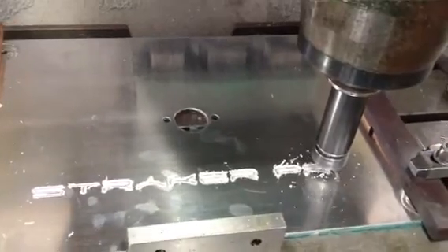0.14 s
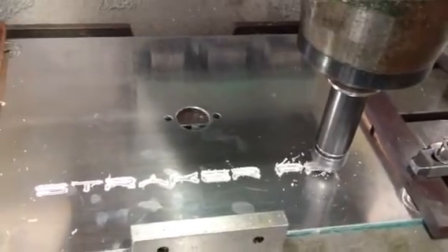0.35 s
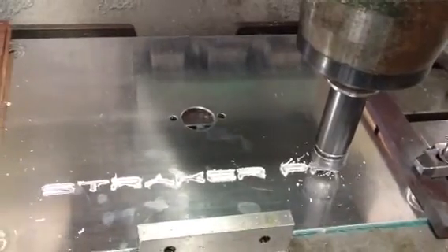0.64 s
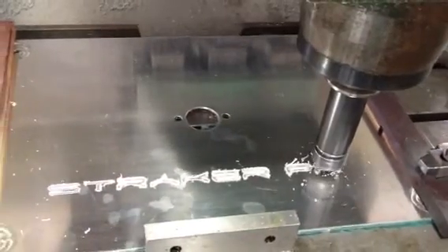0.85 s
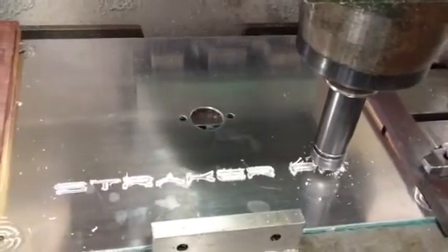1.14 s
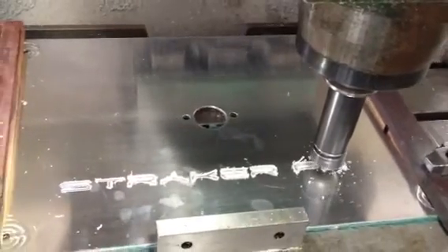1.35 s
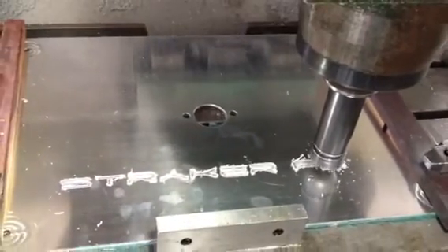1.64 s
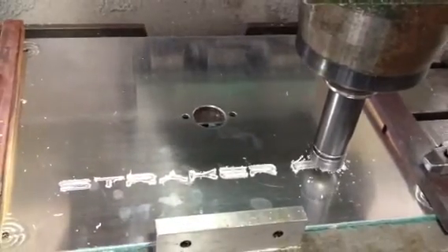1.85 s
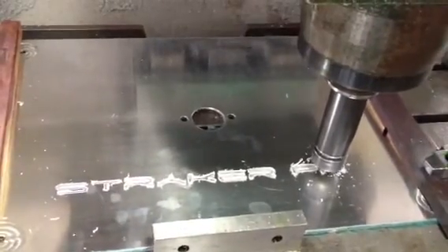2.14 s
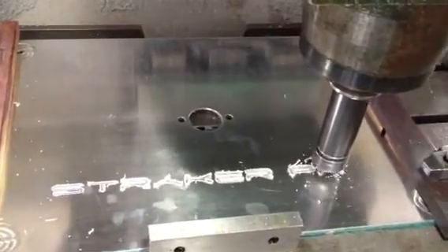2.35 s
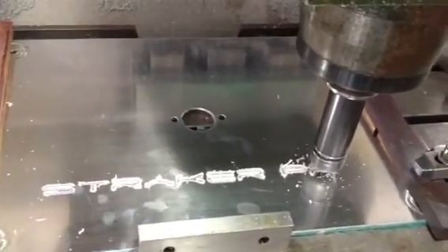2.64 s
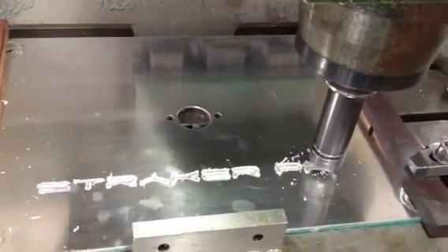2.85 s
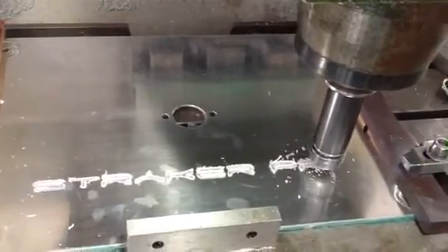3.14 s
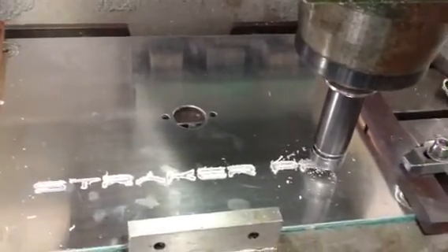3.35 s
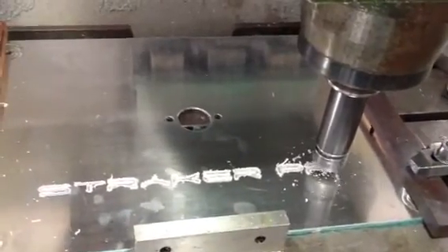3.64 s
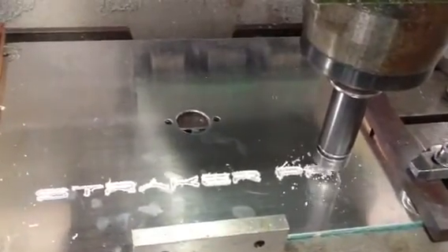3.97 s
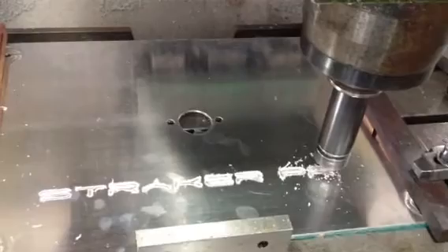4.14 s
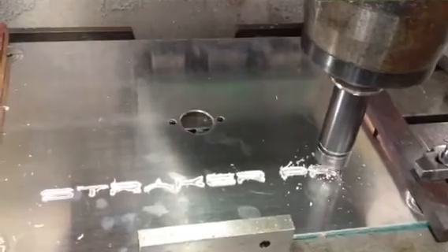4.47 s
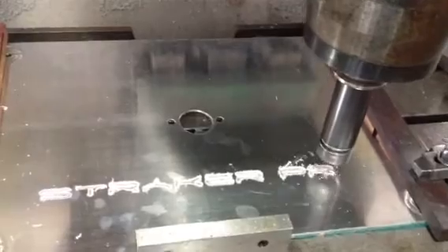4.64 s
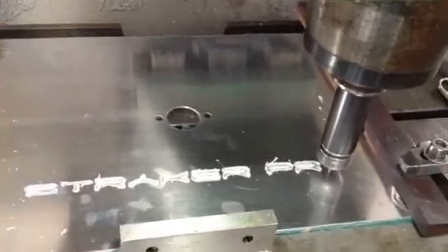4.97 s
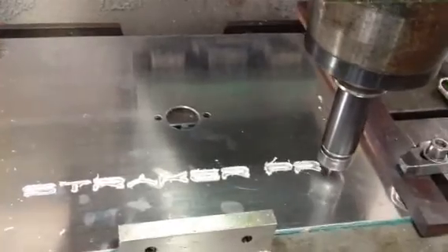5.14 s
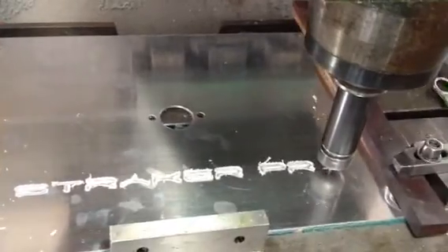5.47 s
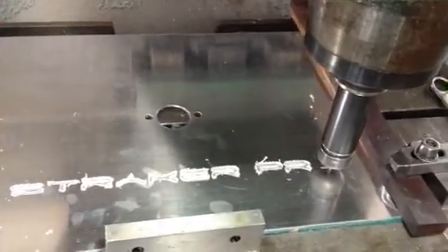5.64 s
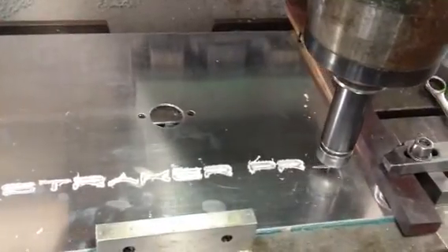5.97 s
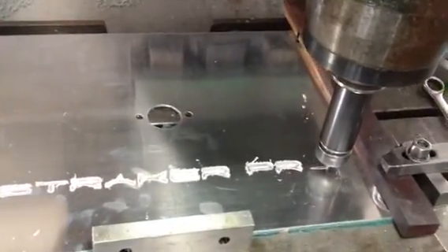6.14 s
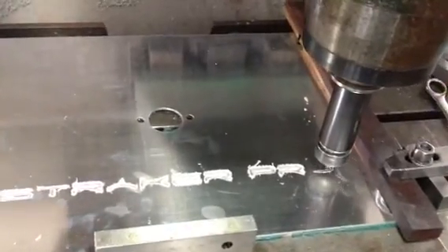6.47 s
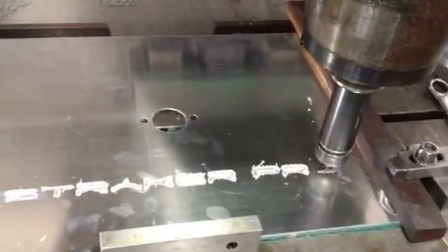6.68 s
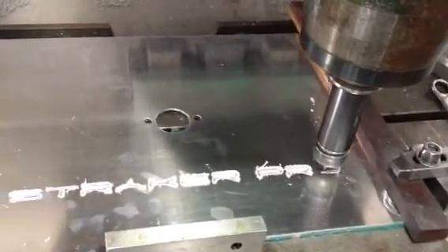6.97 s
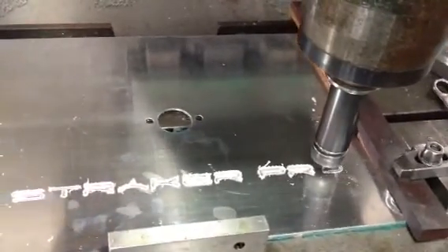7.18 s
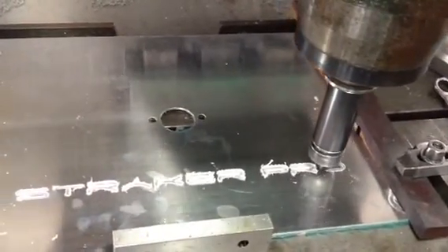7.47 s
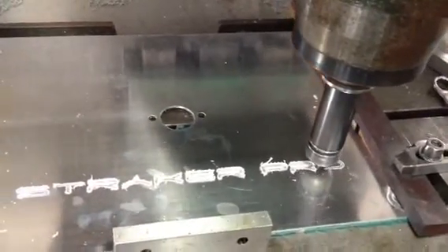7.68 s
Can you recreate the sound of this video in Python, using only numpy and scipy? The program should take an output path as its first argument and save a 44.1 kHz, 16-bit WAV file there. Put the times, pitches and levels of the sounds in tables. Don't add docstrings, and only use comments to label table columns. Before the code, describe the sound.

A milling spindle hums and clatters steadily, muffled then clear, with two faint air puffs before a loud whistling blast of compressed air rings through the workshop.

```python
import sys
import numpy as np
from scipy import signal
from scipy.fft import rfft, irfft, next_fast_len
from scipy.io import wavfile
from scipy.ndimage import uniform_filter1d, map_coordinates

SR = 44100
rng = np.random.default_rng(int(sys.argv[2]) if len(sys.argv) > 2 else 0)


def volts(x):
    e = np.asarray(x, float) / 20
    return 10 ** e


def log_audio(samples):
    frames = np.atleast_2d(samples).T
    limited = np.clip(frames, -1, 1)
    pcm = np.round(limited * 32767).astype(np.int16)
    wavfile.write(sys.argv[1], SR, pcm)


N = 344421
T = np.arange(N) / SR
FAST = next_fast_len(N)
HZ = np.fft.rfftfreq(FAST, 1 / SR)

SPINDLE_HZ = 22.318
GEAR_ORDERS = [5, 14, 15, 16, 17, 22, 26, 27, 28, 29, 31, 33, 39, 42, 48, 50, 56, 58, 60, 72, 77, 82, 107,
               126, 138, 148, 162, 163, 172]
GEAR_DB = [-56, -50, -49, -36, -45, -51, -52, -49, -44, -44, -50, -51, -52, -53, -53, -53, -50, -53, -54,
           -53, -57, -51, -58, -59, -60, -59, -60, -59, -61]
# [f/Hz, level/dB rms each]
CLATTER = [(100, -62), (300, -60), (700, -59), (1500, -63), (2500, -64), (4000, -71), (5500, -79),
           (7000, -88)]
DRIVE_HZ = [117.3, 230.5, 251.1, 345.345, 484.7, 879.3, 1947.9, 2147.7, 2210.9, 5766.2, 6749.8, 8567.0]
DRIVE_DB = [-55, -44, -50, -40, -51, -55, -51, -59, -56, -63, -75, -81]
# [f/Hz, level/dB per Hz]
RUMBLE = [(30, -38), (70, -23), (90, -13.5), (115, -10), (155, 1), (210, 1.5), (450, -2), (740, 0),
          (880, -4.5), (1400, -7), (2700, -12), (4800, -16.5), (6500, -22), (9200, -35.5)]
# [f/Hz, width/Hz, level/dB]
BEARINGS = [(493, 97, 3.5), (885, 30, 5), (1980, 250, 6), (2300, 250, -2.5), (3310, 260, 6),
            (6680, 170, 8.5), (7300, 320, 5), (14100, 2900, -16)]
# [t/s, f/Hz]
FEED_HZ = [
    (0, 234),
    (2.4, 234.1),
    (3.5, 241),
    (3.75, 236),
    (3.95, 243),
    (4.3, 235),
    (4.6, 232),
]
# [harmonic, level/dB]
FEED_TONES = [(1, -2), (2, 0.5), (3, -1.5)]
# [t/s, level/dB]
BITES = [
    (.02, -44),
    (1.4, -35.5),
    (2.0, -40),
    (3.2, -46),
    (3.95, -44),
    (4.3, -41),
]
# [t/s, peak level/dB]
KNOCKS = [(0.081, -31), (1.3, -27), (1.949, -33), (2.461, -29), (3.051, -30), (3.2, -29), (3.699, -30),
          (4.503, -23), (4.623, -23), (4.755, -24), (4.95, -24)]
# [t/s, peak level/dB, f/Hz]
NOZZLE_KNOCK = (4.50, -12.5, 286)
# [start t/s, held t/s, level/dB]
LIGHT_SQUEEZES = [
    (3.066, 0.13, -44),
    (4.255, 0.32, -42),
]
# [start t/s, held t/s, level/dB]
FULL_SQUEEZE = (4.5, .524, -17)
# [f/Hz, level/dB per Hz]
PUFF = [(1180, -26), (2000, -11), (2180, -1.5), (2560, -5.5), (3900, -1.5), (5250, -3.5), (8360, -16),
        (12500, -19), (15100, -17)]
# [f/Hz, level/dB per Hz]
BLAST = [(530, -35), (900, -17.5), (1870, -11), (2080, -11.5), (2260, -13), (2790, -6), (3620, -5.5),
         (4220, -3.5), (5350, -3.5), (6240, -2.5), (10200, -14.5), (13600, -8.5), (15100, -12)]
# [f/Hz, width/Hz, level/dB]
PLATE = [(2800, 82, -7), (4290, 130, 4), (5500, 65, -9), (6180, 110, -4), (6840, 43, -1), (7300, 43, -7),
         (7900, 44, -11), (8240, 51, 5)]
# [f/Hz, t/s]
SHOP_T60_S = [(1000, 1.0), (4000, 0.85), (12000, 0.64)]
# [f/Hz, level/dB]
MUFFLE = [(100, -7), (220, -4.5), (350, -9), (700, -13), (1400, -18), (2800, -24), (5000, -27.5),
          (7000, -22.5), (9500, -23), (13000, -17.5)]
# [t/s, share of the full cut 0-1]
RELEASE = [
    (0, 1),
    (1.9, .99),
    (2.6, 0.78),
    (2.85, 0.43),
    (3.1, 0.12),
    (3.5, 0.04),
    (7.81, 0),
]


def shape(hz, table):
    f, value = np.transpose(table)
    return np.interp(np.log(np.maximum(hz, 1)), np.log(f), value)


def colour(table):
    white = rng.standard_normal(FAST)
    return irfft(rfft(white) * volts(shape(HZ, table)), FAST)[:N]


def level(x, db):
    return x * volts(db) / np.sqrt(np.mean(x ** 2))


def walk(rate, when=T):
    steps = np.repeat(rng.standard_normal(int(N / SR * 50) + 2), 8)
    smooth = 1.295 * uniform_filter1d(uniform_filter1d(steps, size=8), size=8)
    return np.interp(when * min(rate, 50) * 8, np.arange(len(smooth)), smooth)


def flicker(x, slow_db, quick_db, rate):
    hz, s, spec = signal.stft(x, SR, nperseg=512)
    octave = np.clip(np.log2(np.maximum(hz, 1)), 6, 14)[:, None]
    db = 0
    for centre in range(6, 15):
        share = np.clip(1 - abs(octave - centre), 0, 1)
        db = db + share * (slow_db * walk(1.48, s) + quick_db * walk(rate, s))
    return signal.istft(spec * volts(db), SR)[1][:N]


def resonate(x, peaks, boost):
    lift = 1 + sum(boost * volts(db) / (1 + (2 * (HZ - f) / width) ** 2) for f, width, db in peaks)
    return irfft(rfft(x, FAST) * lift, FAST)[:N]


def spindle():
    orders = np.arange(5, 320)
    chance = rng.standard_normal((len(orders), 2))
    scatter = (chance[:, 0] + 1j * chance[:, 1]) / np.sqrt(2)
    weak, strong = np.zeros((2, 4097), complex)
    weak[orders] = volts(shape(orders * SPINDLE_HZ, CLATTER)) * scatter
    weak[GEAR_ORDERS] = 0
    order = np.array(GEAR_ORDERS)
    timing = rng.random(30)[order // 6]
    strong[GEAR_ORDERS] = volts(np.array(GEAR_DB)) * np.exp(2j * np.pi * (order ** 2 / 4 + order * timing))
    turn = irfft(weak + strong) * 4096 * np.sqrt(2)
    place = (SPINDLE_HZ * T + 0.0003 * walk(2)) % 1 * 8192
    clatter = map_coordinates(turn, [place], order=3, mode="grid-wrap")
    return flicker(clatter, 0.48, 0.6, 6)


def drive():
    out = np.zeros(N)
    for hz, db in zip(DRIVE_HZ, DRIVE_DB):
        loudness = np.sqrt(2) * volts(db + 0.5 * walk(4.97))
        out += loudness * np.sin(2 * np.pi * (hz * T + rng.random()) + 0.19 * walk(2.86))
    return out


def rumble():
    noise = resonate(colour(RUMBLE), BEARINGS, 0.37)
    return level(flicker(noise, 0.46, 0.95, 12), -34.5)


def feed():
    idle_db, fade_db_s = -46, 31
    stop_s, stop_db_s = 4.9, 119
    speed_hz = np.interp(T, *np.transpose(FEED_HZ)) * (1 + 0.0028 * walk(12))
    phase = 2 * np.pi * np.cumsum(speed_hz) / SR
    load_db = np.max([db - fade_db_s * abs(T - s) for s, db in BITES], axis=0)
    gain = volts(np.maximum(load_db, idle_db) - stop_db_s * np.maximum(T - stop_s, 0))
    return gain * sum(volts(db + 3.6 * walk(9)) * np.sin(k * phase) for k, db in FEED_TONES)


def knocks():
    table_hz, ring_cycles = 154.5, 33.5
    thud = level(colour([(60, -24), (130, -16), (320, -3), (700, -12), (1500, -52)]), -6.5)
    out = np.zeros(N)
    for s, db, hz in [(s, db, table_hz) for s, db in KNOCKS] + [NOZZLE_KNOCK]:
        t = np.maximum(T - s, 0)
        t60 = ring_cycles / hz
        fade = volts(db - 60 * t / t60) * np.minimum(t / 0.02, 1) ** 2
        out += fade * (np.sin(2 * np.pi * hz * t) + thud)
    return out


def trigger(squeezes, open_s, bend, close_db_s):
    out = np.zeros(N)
    for s, held, db in squeezes:
        opening = np.clip((T - s) / open_s, 0, 1) ** bend
        out += opening * volts(db - close_db_s * np.maximum(T - s - held, 0))
    return out


def bounce(x, echo_db, reach_s, drift_s):
    out = x
    for lag in reach_s * rng.random(6) ** 1.5:
        heard = np.clip(SR * (T - lag - drift_s * walk(5)), 0, N - 1).astype(int)
        out = out + volts(echo_db) * x[heard]
    return out


def blow_gun():
    puff = level(flicker(colour(PUFF), 0.34, 0.49, 24.4), 9.4)
    puff = puff * trigger(LIGHT_SQUEEZES, open_s=0.055, bend=1.1, close_db_s=68)
    jet = bounce(resonate(colour(BLAST), PLATE, 0.61), echo_db=-15.5, reach_s=0.008, drift_s=0.0001)
    blast = level(flicker(jet, 0.18, 0.89, 40), 0.75)
    blast = blast * trigger([FULL_SQUEEZE], open_s=0.17, bend=2.12, close_db_s=330)
    surge_s, surge_width_s, surge_db = 4.693, 0.014, 3.5
    surge = volts(surge_db * np.exp(-((T - surge_s) / surge_width_s) ** 2))
    return puff + blast * surge


def shop(x):
    hz, s, spec = signal.stft(rng.standard_normal(SR), SR, nperseg=256)
    fade_db = -60 * s / shape(hz, SHOP_T60_S)[:, None]
    tail = signal.istft(spec * volts(fade_db), SR)[1]
    tail = tail * (1 - np.exp(-np.arange(len(tail)) / SR / 0.024))
    return signal.fftconvolve(x, tail / np.sqrt(np.sum(tail ** 2)))[:N]


def scene():
    air = blow_gun()
    machine = spindle() + drive() + feed() + rumble() + knocks()
    mono = machine + air + volts(-14) * shop(air)
    return np.array([mono, mono])


def suppress(x):
    treble_lag_s, loud_lets_go_s = 0.16, 3.225
    tones_spared = 0.56
    gain_db, duck_db, duck_s, recover_s = 1.03, -1.97, 4.65, 2.4
    hz, s, spec = signal.stft(x, SR, nperseg=1024)
    bass, treble = (np.interp(s - lag, *np.transpose(RELEASE)) for lag in (0, treble_lag_s))
    treble = treble * np.clip((loud_lets_go_s - s) / 0.15 + 0.5, 0.02, 1)
    height = shape(hz, [(700, 0.069), (5000, 0.94)])[:, None]
    share = np.clip(bass + height * (treble - bass), 0, 1)
    usual_db = 20 * np.log10(np.median(abs(spec[0]), axis=1) + 1e-9)
    tones_db = np.maximum(usual_db - uniform_filter1d(usual_db, size=9), 0) * (hz > 1200)
    cut_db = (shape(hz, MUFFLE) + tones_spared * tones_db)[:, None] * share
    volume_db = gain_db + duck_db * (s > duck_s) * np.exp(-np.maximum(s - duck_s, 0) / recover_s)
    return signal.istft(spec * volts(cut_db + volume_db), SR)[1][:, :N]


def roll_off(x):
    return signal.sosfilt(signal.butter(12, 15260, fs=SR, output="sos"), x)


def record(dry):
    no_bass = signal.sosfilt(signal.butter(2, 75, "high", fs=SR, output="sos"), dry)
    mix = suppress(no_bass)
    return roll_off(mix)


dry = scene()
out = record(dry)
log_audio(out)
```